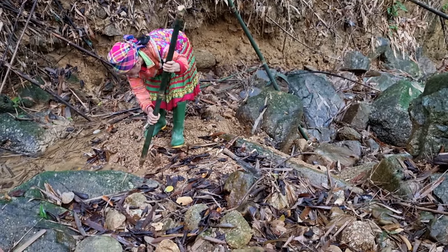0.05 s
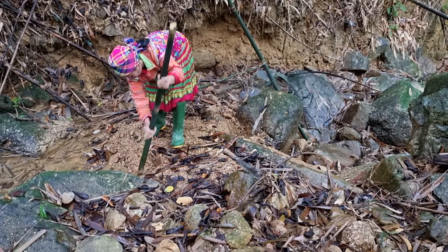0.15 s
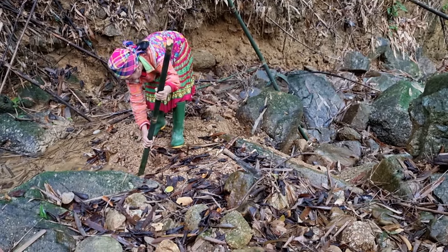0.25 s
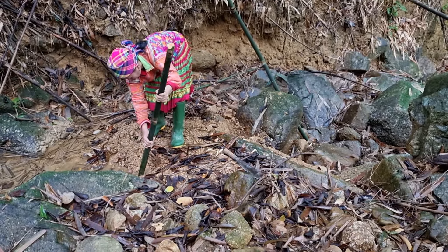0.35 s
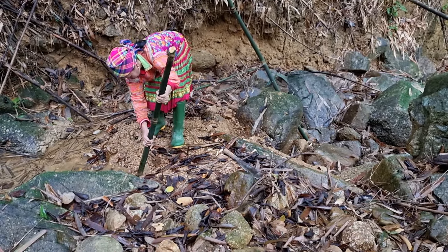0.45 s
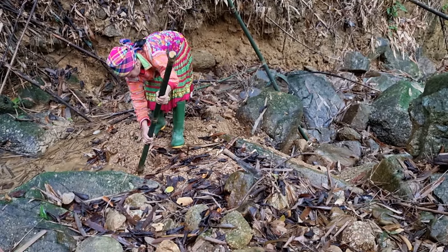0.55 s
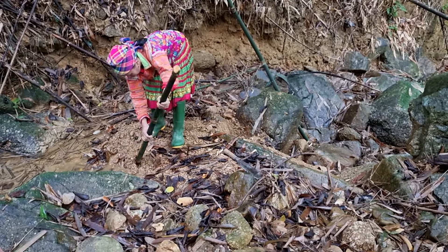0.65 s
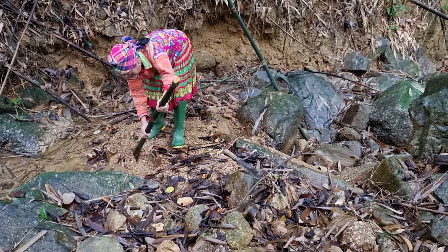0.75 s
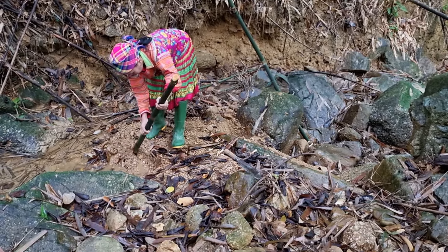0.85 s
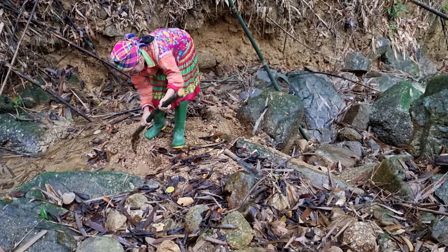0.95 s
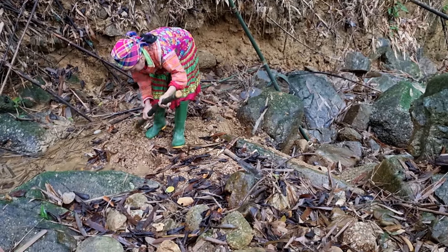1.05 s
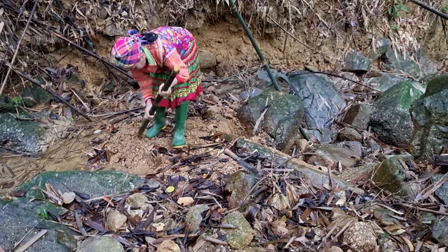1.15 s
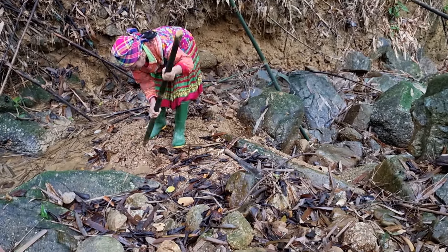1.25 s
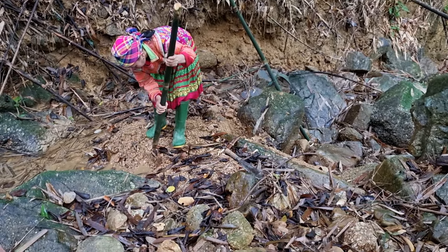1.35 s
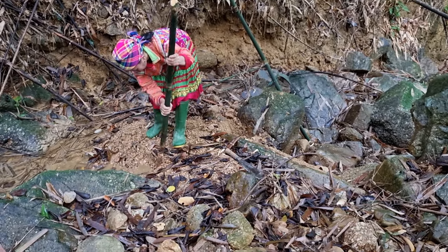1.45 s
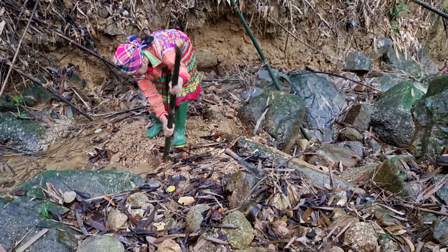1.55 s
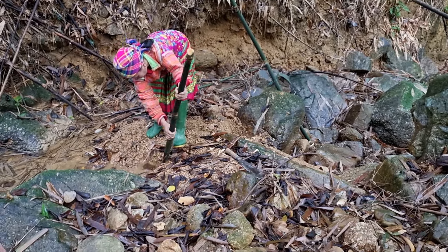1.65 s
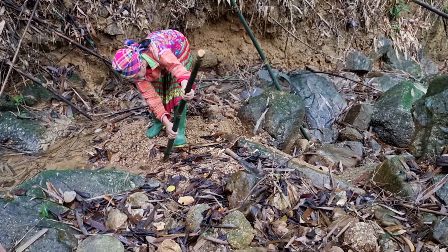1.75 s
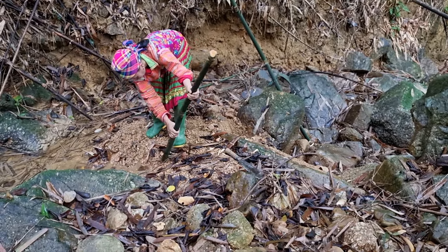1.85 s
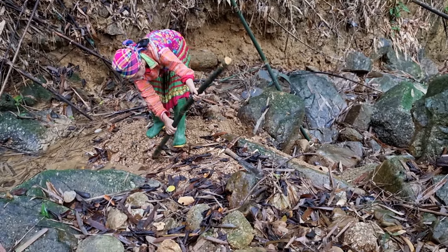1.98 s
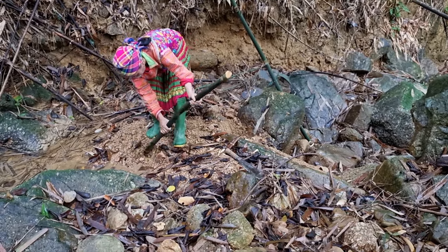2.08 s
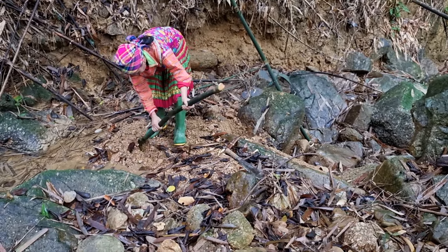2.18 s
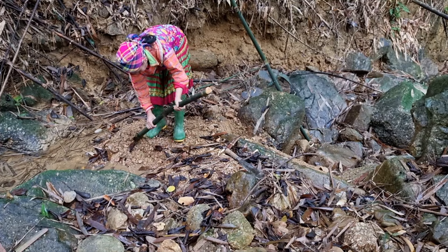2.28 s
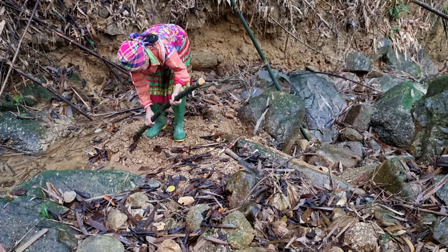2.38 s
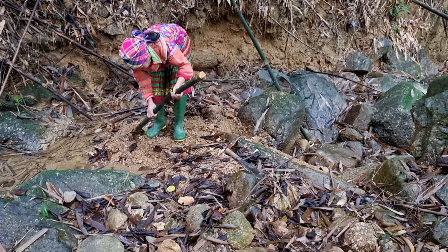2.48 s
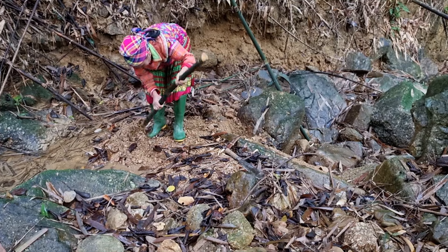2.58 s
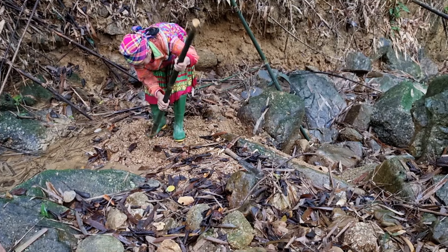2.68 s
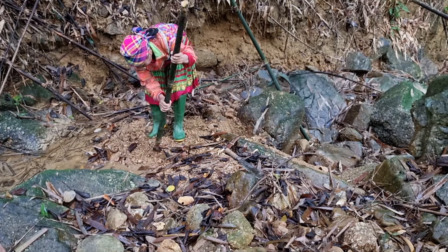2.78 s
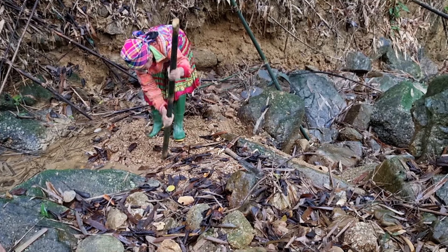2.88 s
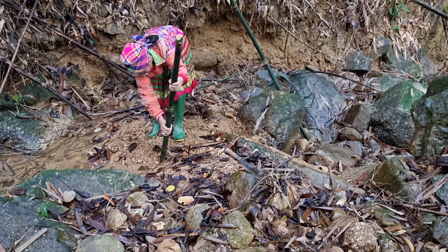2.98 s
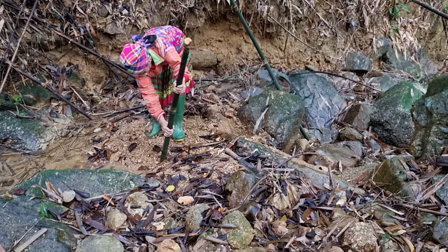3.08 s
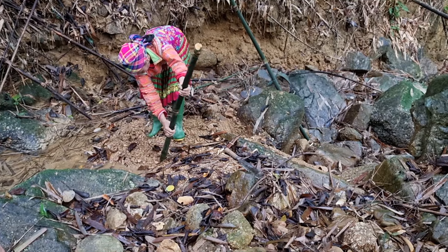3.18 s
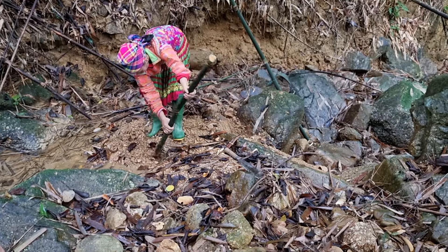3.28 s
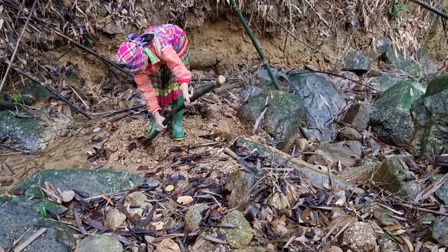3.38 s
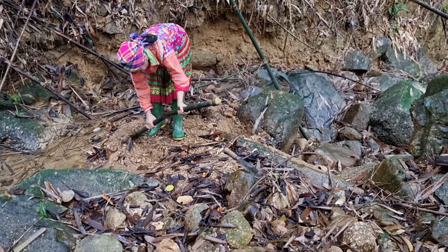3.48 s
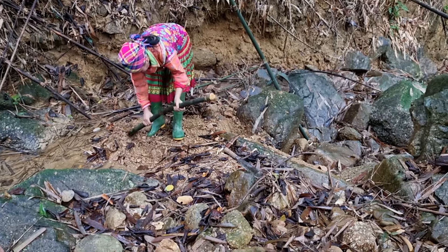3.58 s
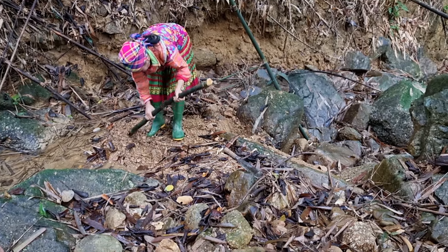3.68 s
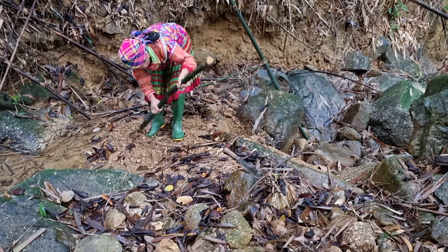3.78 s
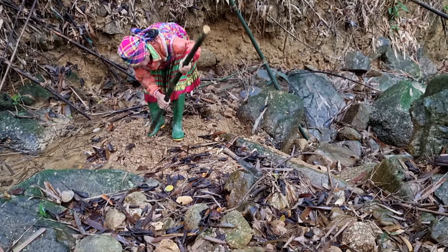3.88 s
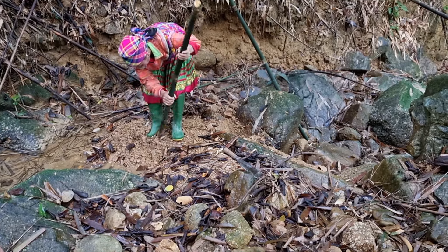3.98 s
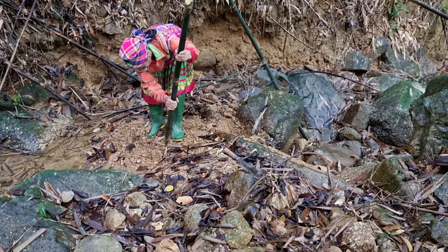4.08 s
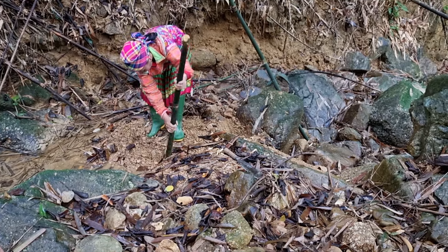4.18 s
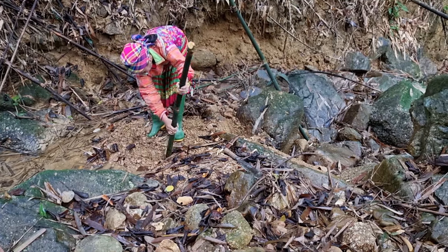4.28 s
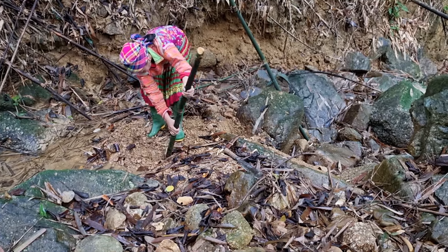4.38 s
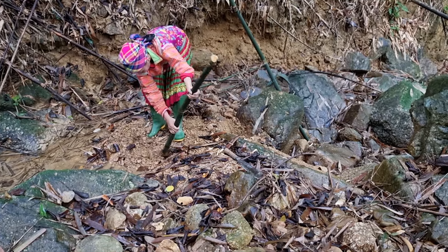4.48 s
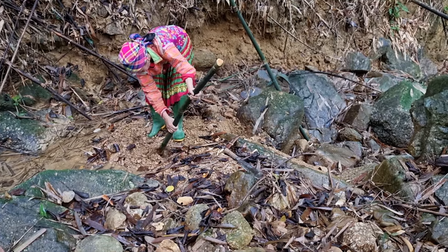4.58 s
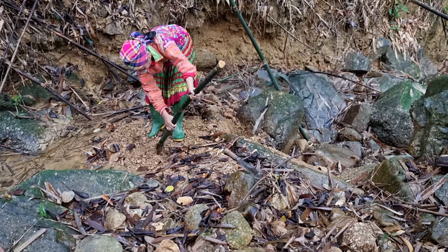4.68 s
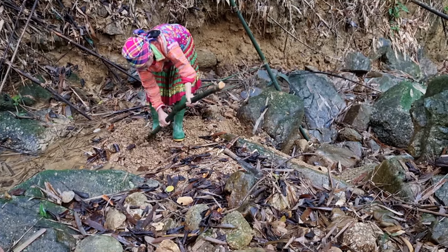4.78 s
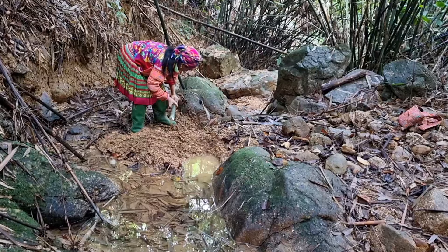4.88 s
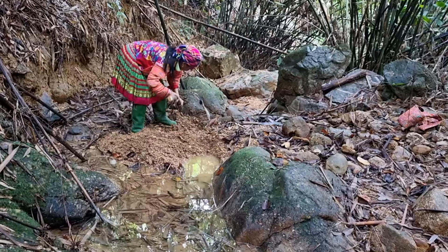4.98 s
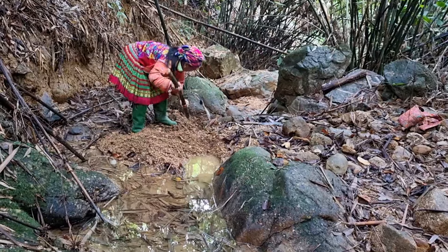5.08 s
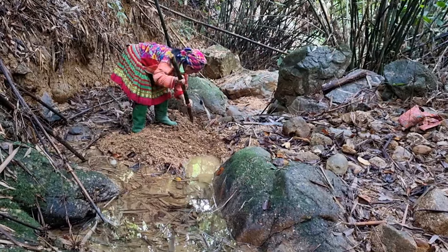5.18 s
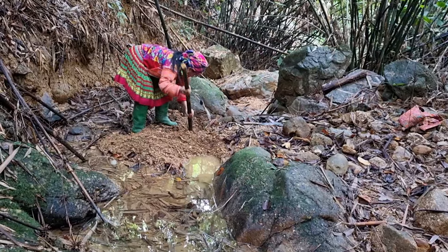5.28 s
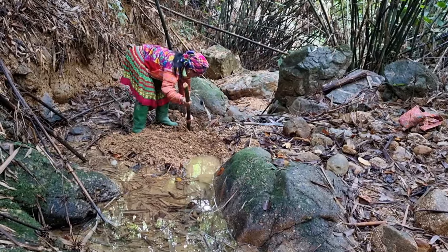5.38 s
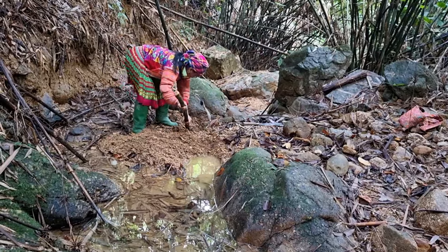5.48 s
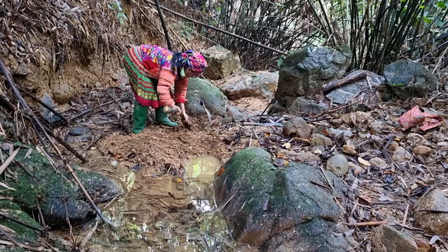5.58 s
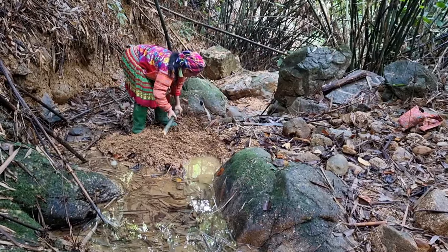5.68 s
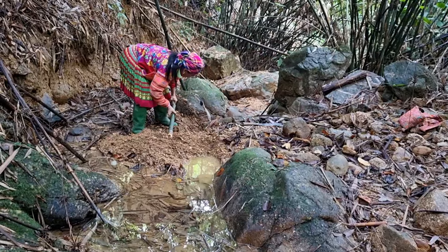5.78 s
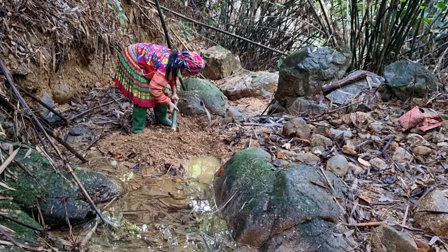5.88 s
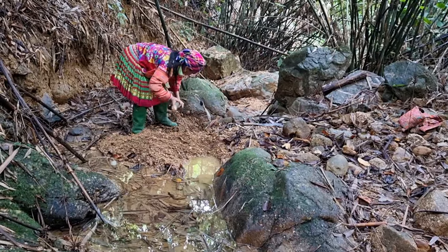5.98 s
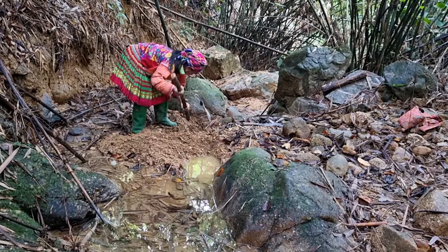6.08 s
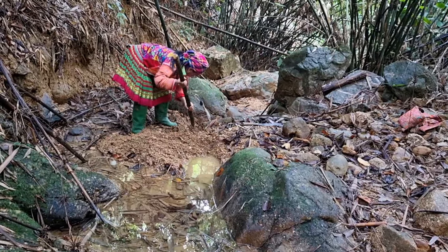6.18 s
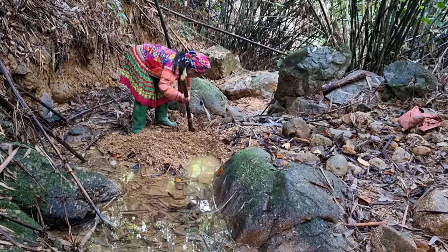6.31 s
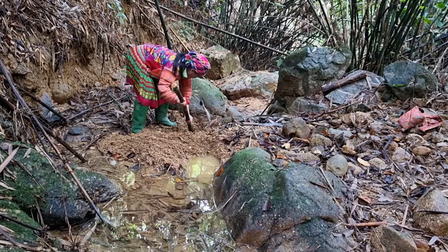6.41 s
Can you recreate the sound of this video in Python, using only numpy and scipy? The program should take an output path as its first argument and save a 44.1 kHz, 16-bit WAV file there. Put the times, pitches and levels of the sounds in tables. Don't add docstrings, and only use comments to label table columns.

```python
import sys
import numpy as np
from scipy import signal
from scipy.io import wavfile
from scipy.ndimage import map_coordinates

SR = 44100
rng = np.random.default_rng(int(sys.argv[2]) if len(sys.argv) > 2 else 0)


def store_wav(level_fs):
    pcm = np.round(np.clip(np.atleast_2d(level_fs), -1, 1) * 32767)
    wavfile.write(sys.argv[1], SR, pcm.T.astype(np.int16))


def magnitude_from_level(level_db):
    exponent = np.asarray(level_db, float) / 20
    return 10 ** exponent


N = 284445
JOIN_S = 4.96


def rms_one(x):
    return x / np.sqrt(np.mean(x ** 2) + 1e-20)


def in_time(rows):
    s, *columns = np.transpose(rows)
    return [np.interp(np.arange(N) / SR, s, column) for column in columns]


def at_hz(points, hz):
    curve_hz, value = np.transpose(points)
    return np.interp(np.log(hz), np.log(curve_hz), value)


def drift(rate_hz):
    r = np.exp(-32 * np.pi * rate_hz / SR)
    white = rng.standard_normal(N // 16 + 2002)
    slow = signal.lfilter([1], [1, -2 * r, r * r], white)[2000:]
    return np.interp(np.arange(N) / 16, np.arange(len(slow)), rms_one(slow))


def resonate(x, hz, width_hz):
    r, w = np.exp(-np.pi * width_hz / SR), 2 * np.pi * hz / SR
    gain = np.sqrt((1 - r * r) / 2)
    return signal.lfilter(gain * np.array([1, 0, -1]), [1, -2 * r * np.cos(w), r * r], x + 1e-18)


def grains(per_s, spread_db):
    sizes_db = spread_db * np.minimum(rng.exponential(1, N), 5)
    signed = magnitude_from_level(sizes_db) * rng.choice([-1, 1], N)
    return rms_one(signed * (rng.random(N) < per_s / SR))


# frequency_hz [Hz], density_db [dB per Hz]
BROOK_SPECTRUM = [(30, -22.5), (98, -19.5), (270, -23), (600, -9), (950, -10.5), (1300, -9), (1500, -4.5),
                  (1900, 0.5), (3000, -4), (6000, -5.5), (7600, -6.5), (9500, -11.5), (15000, -10)]
# start_s [s], level_db [dB]
BROOK_FLOW = [(0, -47.5), (1.5, -48.5), (2.06, -43.5), (2.75, -48.5), (3.5, -43.5), (3.95, -49.5),
              (4.9, -44), (5.0, -45.5), (5.6, -44.5), (6.45, -41)]
# frequency_hz [Hz], likeness [-1 to 1]
BROOK_COHERENCE = [(60, 0.12), (290, 0.68), (640, 0), (15000, 0.0049)]


def brook():
    out, together = 0, drift(4)
    edges_hz = 33.2 * 2 ** np.arange(0, 9.1, 1 / 3)
    white = rng.standard_normal((2, 2, N))
    for k, (low, high) in enumerate(zip(edges_hz, edges_hz[1:])):
        band = signal.butter(3, [low, high], "band", fs=SR, output="sos")
        mid, side = signal.sosfilt(band, white[k % 2])
        hz = np.sqrt(low * high)
        alike = np.clip(at_hz(BROOK_COHERENCE, hz), -1, 1)
        gain = magnitude_from_level(at_hz(BROOK_SPECTRUM, hz) + 0.7 * together + 0.9 * drift(14))
        out = out + gain * (np.sqrt(1 + alike) * mid + np.sqrt(1 - alike) * side * [[1], [-1]])
    return rms_one(out) * magnitude_from_level(in_time(BROOK_FLOW)[0] + 3.5)


PEBBLES_DB_PER_S, GRIT_DB_PER_S, CLODS_DB_PER_S, THUMP_DB_PER_S = 597, 323.5, 454, 417
STAB_HOLE_HZ = 1750


def push_db(t, push_s, level_db, release_db_per_s):
    sag = -69.5 * np.clip(t, 0, push_s)
    attack = 2600 * t
    release = release_db_per_s * (push_s - t)
    return level_db + sag + np.minimum(0, np.minimum(attack, release))


# start_s [s], push_s [s], pebbles_db [dB], grit_db [dB], thump_db [dB]
STAB_EVENTS = [(0.0, 0.016, -54, -44.5, -77), (0.77, .06, -60, -45, -80), (0.99, 0.036, -61, -47.5, -78),
               (1.772, 0.011, -51, -44, -75), (2.05, 0.054, -45, -36, -70), (0.21, .02, -47, -40, -65),
               (0.229, 0.037, -33.5, -32.5, -48.5), (0.479, 0.032, -44, -46, -63),
               (1.572, 0.059, -24.5, -29, -40.5), (1.817, 0.025, -38.5, -60, -62),
               (2.751, .02, -59, -42, -78), (2.903, 0.0055, -50, -60, -73), (2.953, 0.037, -27, -27.5, -40),
               (3.859, 0.01, -53, -41.5, -84), (4.218, .024, -26, -28, -43.5),
               (4.25, 0.025, -36, -32.5, -51.5), (5.376, 0.022, -30.5, -38, -41.5),
               (5.405, 0.029, -31.5, -33, -43.5), (5.658, 0.017, -32, -37.5, -52),
               (6.322, 0.047, -33, -37, -57), (6.363, 0.073, -25.5, -34, -43)]


def stabs(t):
    moves = []
    for s, push_s, pebbles_db, grit_db, thump_db in STAB_EVENTS:
        since, late = t - s, t - s - 0.0085
        driven = push_db(since, push_s, grit_db, GRIT_DB_PER_S)
        settling = push_db(since, push_s, grit_db - 10, 108)
        levels = [push_db(since, push_s, pebbles_db, PEBBLES_DB_PER_S),
                  np.maximum(driven, settling),
                  push_db(late, push_s, thump_db + 0.5, CLODS_DB_PER_S),
                  push_db(late, push_s, thump_db, THUMP_DB_PER_S)]
        firmer = 1.3 if s > JOIN_S else 1
        moves.append((levels, STAB_HOLE_HZ * firmer))
    return moves


# start_s [s], length_s [s], clods_db [dB], thump_db [dB]
CLOD_EVENTS = [(0.057, .015, -57.5, -82), (0.237, .02, -52.5, -48), (0.773, .04, -46, -56.5),
               (1.72, 0.033, -62, -58), (2.27, 0.089, -44.5, -46.5), (2.778, 0.035, -50, -59),
               (3.37, 0.015, -46.5, -50), (3.536, 0.032, -44, -52), (5.132, 0.019, -51, -63),
               (6.327, .045, -42, -66), (6.376, 0.045, -36.5, -60)]


def clod_falls(t, trickle):
    moves = []
    for s, length_s, clods_db, thump_db in CLOD_EVENTS:
        levels = [trickle[0], trickle[1],
                  push_db(t - s, length_s, clods_db, CLODS_DB_PER_S),
                  push_db(t - s, length_s, thump_db, THUMP_DB_PER_S)]
        moves.append((levels, STAB_HOLE_HZ))
    return moves


# start_s [s], pressure_db [dB], pitch_hz of the opening hole [Hz]
DRAG_STROKES = [
    [(.54, -57, 1800), (.6, -40, 1800), (.635, -37.5, 1600), (.68, -39, 1240), (.82, -42, 1100),
     (.88, -47, 830), (.966, -44.5, 780), (1.0, -65, 780)],
    [(1.86, -51, 1800), (1.95, -37, 1830), (1.975, -41, 1700), (2.08, -34.5, 1290), (2.125, -37.5, 1280),
     (2.2, -37.5, 1270), (2.28, -38.5, 1250), (2.345, -45.5, 560), (2.5, -58.5, 1500)],
    [(3.225, -63, 1900), (3.26, -42.5, 1900), (3.38, -34.5, 1220), (3.445, -39.5, 1250),
     (3.48, -34.5, 1260), (3.575, -43.5, 1280), (3.68, -66, 1800)],
    [(4.42, -51, 1500), (4.51, -39.5, 1230), (4.59, -39.5, 1300), (4.69, -44.5, 1400), (4.78, -39, 1460),
     (4.85, -41.5, 720), (4.9, -39, 720)],
]
# grit_db [dB], clods_db [dB], thump_db [dB]
DRAG_LAYERS = [
    (-6, -8.5, -28.5),
    (-7.5, -10, -17.5),
    (-5, -9.5, -21.5),
    (-9.5, -9.5, -27),
]


def drags(t):
    moves = []
    for rows, (grit_db, clods_db, thump_db) in zip(DRAG_STROKES, DRAG_LAYERS):
        s, db, hz = np.transpose(rows)
        pressure = np.interp(t, s, db, left=-120, right=-120)
        along = np.clip((t - s[0]) / (s[-1] - s[0]), 0, 1) - 0.5
        levels = [pressure,
                  pressure + grit_db,
                  pressure + clods_db + 3.5 * along,
                  pressure + thump_db + 9 * along]
        moves.append((levels, np.interp(t, s, hz)))
    return moves


# pebbles_db [dB], grit_db [dB], clods_db [dB], thump_db [dB]
TRICKLE_LEVELS = [
    (-76.5, -62, -76.5, -83),
    (-46.5, -44, -56.5, -76),
]


def effort():
    t = np.arange(0, N + 32, 32) / SR
    levels = np.array(TRICKLE_LEVELS, float)[(t > JOIN_S).astype(int)].T
    hole_hz = np.full(len(t), float(STAB_HOLE_HZ))
    for move, hz in stabs(t) + clod_falls(t, levels) + drags(t):
        hole_hz = np.where(move[0] > levels[0], hz, hole_hz)
        levels = np.maximum(levels, move)
    return in_time(np.column_stack([t, *levels, hole_hz]))


# frequency_hz [Hz], density_db [dB per Hz]
GRAVEL_SPECTRUM = [(200, -5.5), (400, -20), (700, 1), (1000, -6), (1300, -1), (2000, -1.5), (2500, -3.5),
                   (3200, -6.5), (4600, -7.5), (6000, -15.5), (8000, -15), (9500, -18), (16000, -25)]


def grinding(pebbles_db, grit_db, clods_db, hole_hz):
    out = np.zeros(N)
    slips_db = 1.4 * drift(46) + 1.04 * drift(240)
    cracks = grains(per_s=700, spread_db=5.0)
    for hz in np.geomspace(250, 15500, num=28):
        fine = np.clip(np.log(hz / 2250) / np.log(1.35), 0, 1)
        coarse = np.clip(np.log(1100 / hz) / np.log(1.6), 0, 1)
        force_db = pebbles_db + fine * grit_db + coarse * clods_db + slips_db + 0.7 * drift(33)
        colour_db = at_hz(GRAVEL_SPECTRUM, hz) + 10 * np.log10(hz / 1500) + 5.74 * fine + 9.3 * coarse - 9
        hollow_db = 5.3 * np.exp(-(np.log(hz / hole_hz) / 0.24) ** 2)
        contacts = grains(per_s=300 + 0.7 * hz, spread_db=3.0) + 0.55 * cracks
        struck = resonate(contacts * magnitude_from_level(force_db + colour_db + hollow_db + 0.5), hz, 0.28 * hz)
        out += resonate(struck, hz, 0.28 * hz) * np.sqrt(hz / SR)
    return out


# pitch_hz [Hz], width_hz [Hz], level_db [dB]
GROUND_MODES = [(62, 43, -5), (117, 46, 0), (197.4, 54, -1.5), (318, 23, -8)]


def thumps(thump_db):
    pushes = grains(per_s=600, spread_db=-0.5) * magnitude_from_level(thump_db - 4.5)
    shake = sum(magnitude_from_level(db) * resonate(pushes, hz, width_hz) for hz, width_hz, db in GROUND_MODES)
    return signal.sosfilt(signal.butter(2, [42, 450], "band", fs=SR, output="sos"), shake)


def crackle():
    envelope = signal.lfilter([1], [1, -0.97], np.abs(grains(per_s=90, spread_db=1.0)))
    ticks = envelope * rng.standard_normal(N)
    bright = signal.sosfilt(signal.butter(2, 3000, "high", fs=SR, output="sos"), ticks)
    level_db = np.where(np.arange(N) / SR < JOIN_S, -60, -47.5)
    return rms_one(bright) * magnitude_from_level(level_db)


# start_s [s], peak_db [dB], pitch_hz [Hz], grit_share_db [dB]
FIRST_SPOT_STONES = [(0.225, -16, 2400, -3), (0.239, -20, 1920, -5), (1.596, -6, 2700, -20),
                     (0.677, -20.5, 1210, 4), (1.171, -22, 6700, -5), (1.271, -26.5, 5000, 4),
                     (1.399, -28.5, 7700, -12), (1.454, -19.5, 5000, -10), (2.484, -21.5, 4330, 2),
                     (2.517, -23, 4120, -5), (2.75, -24.5, 2280, 10), (2.778, -25.5, 7700, -10),
                     (2.907, -24.5, 7600, -17), (2.951, -27.5, 1630, -7.5), (3.863, -24, 2300, 2),
                     (0.522, -27.5, 1490, -15), (0.634, -17, 1930, -25), (0.859, -28, 1510, 1),
                     (1.998, -23, 1530, 0), (2.088, -14, 1400, -22), (2.135, -25, 1250, -20),
                     (2.2, -17, 1300, -20), (3.243, -29, 2000, -15), (3.45, -18, 1840, -4),
                     (4.384, -25, 1870, -21), (4.633, -30, 2210, 7)]
# start_s [s], peak_db [dB], pitch_hz [Hz], grit_share_db [dB]
SECOND_SPOT_STONES = [(5.061, -30.5, 1540, 6.5), (5.119, -36, 1950, 8), (5.14, -26, 5500, 4),
                      (5.214, -13.5, 3000, -6), (5.255, -17.5, 3260, -2), (5.302, -19.5, 3880, -2),
                      (5.385, -20.5, 6500, -9), (5.56, -38, 2060, -12), (5.582, -16, 3050, -11),
                      (5.606, -30, 5860, 11), (5.749, -25, 7610, -5), (5.784, -22, 4840, 1),
                      (5.806, -25, 6150, 1), (5.85, -25, 6540, 6), (5.88, -15.5, 6400, -10),
                      (5.894, -16, 7900, -3), (5.911, -13, 2840, -9), (5.971, -17, 3760, -18),
                      (6.01, -16, 1880, -0.5), (6.059, -11, 3400, -14), (6.088, -28, 1330, 5),
                      (6.131, -16.5, 4600, 3.5), (6.173, -22, 5480, 0.5), (6.228, -27.5, 8100, 5),
                      (6.33, -17, 1400, -11), (6.369, -7.5, 1930, -31), (6.385, -13, 2900, -19),
                      (6.4, -6, 2870, -15)]
# start_s [s], peak_db [dB], pitch_hz [Hz]
SHAFT_KNOCKS = [(0.479, -21.5, 2300), (0.626, -12, 1570), (0.747, -22, 1200), (1.575, -20, 1290),
                (1.589, -16, 1610), (1.773, -23.5, 1990), (1.825, -24, 1340), (1.907, -24, 2370),
                (2.015, -16.5, 3070), (2.072, -17, 1400), (2.13, -18, 1750), (2.155, -21, 1210),
                (2.18, -14, 1670), (2.243, -22.5, 1510), (2.298, -24.5, 1290), (2.961, -9.5, 1350),
                (3.277, -16, 2340), (3.321, -16, 2100), (3.37, -10.5, 1240), (3.408, -21, 1250),
                (3.467, -15.5, 1240), (3.504, -12.5, 1620), (4.222, -12, 1960), (4.229, -8, 1360),
                (4.588, -17, 1490), (4.844, -27, 680), (5.382, -5.5, 2460), (5.664, -10.5, 1620),
                (6.411, -7, 2020), (6.423, -10, 1990)]


def stones():
    out, t = np.zeros(N + 2000), np.arange(2000) / SR
    shape = (1 - np.exp(-t / 0.0014)) * (np.exp(-t / 0.0015) + 0.091 * np.exp(-t / 0.017))
    knocked = [(s, db, hz, -19) for s, db, hz in SHAFT_KNOCKS]
    for s, db, hz, grit_db in knocked + list(FIRST_SPOT_STONES) + list(SECOND_SPOT_STONES):
        chatter = rng.standard_normal(2000) * magnitude_from_level(7.3 * rng.standard_normal(2000)) * shape
        ring = resonate(chatter, hz, 0.16 * hz)
        spray = np.diff(resonate(chatter, 3100, 5100), prepend=0)
        click = ring / np.abs(ring).max() + magnitude_from_level(grit_db + 3.5) * spray / np.abs(spray).max()
        out[round(s * SR):][:2000] += magnitude_from_level(db - 7) * click
    return out[:N]


# start_s [s], pitch_hz [Hz], level_db [dB]
DOVE_COO = [
    (3.86, 555, -115),
    (3.92, 560, -65),
    (4.05, 562, -69),
    (4.1, 560, -89),
    (4.16, 560, -81),
    (4.4, 555, -61),
    (4.46, 550, -111),
]


def dove():
    hz, db = in_time(DOVE_COO)
    return magnitude_from_level(db + 1.5 * drift(25)) * np.sin(2 * np.pi * np.cumsum(hz) / SR)


RIGHT_PORT_LAG = [2.81, 6.6]


def ports(x, scatter_db=1.0, decay_s=0.003, hop=1024):
    lag = np.where(np.arange(N) / SR < JOIN_S, *RIGHT_PORT_LAG)
    direct = np.array([x, map_coordinates(x, [np.arange(N) - lag], order=3)])
    highs = signal.lfilter(*signal.butter(1, 1700, "high", fs=SR), x)
    t, scattered = np.arange(hop) / SR, np.zeros((2, N + 4 * hop))
    window = np.sqrt(np.hanning(2 * hop))
    tail = np.exp(-t / decay_s) * (t > 0.0004) / np.sqrt(decay_s * SR / 2)
    for i in range(0, N, hop):
        piece = highs[i:i + 2 * hop]
        echoes = rng.standard_normal((2, hop)) * tail
        heard = signal.fftconvolve((piece * window[:len(piece)])[None], echoes, axes=1)
        scattered[:, i:i + heard.shape[1]] += heard
    return direct + magnitude_from_level(scatter_db) * scattered[:, :N]


def fade():
    t = np.arange(N) / SR
    out_db = -300 * np.maximum(t - 4.845, 0) - 3500 * np.maximum(t - 4.884, 0)
    rise = np.clip((t - 5.012) / 0.05, 0, 1) ** 1.9
    return magnitude_from_level(out_db) + rise


def scene():
    pebbles_db, grit_db, clods_db, thump_db, hole_hz = effort()
    digging = grinding(pebbles_db, grit_db - pebbles_db, clods_db - pebbles_db, hole_hz)
    digging = digging + thumps(thump_db) + stones() + crackle()
    spread = thumps(thump_db - 16) * [[1], [-1]]
    return ports(digging) * magnitude_from_level([[0.2], [-0.2]]) + spread + brook() + dove()


def band_limit(x):
    return signal.sosfilt(signal.butter(12, 16170, fs=SR, output="sos"), x)


def record(dry):
    lifted = dry + magnitude_from_level(-18.5) * resonate(dry, 7730, 990)
    cut = signal.sosfilt(signal.cheby2(16, 60, 16100, fs=SR, output="sos"), lifted)
    return band_limit(cut * fade())


dry = scene()
out = record(dry)
store_wav(out)
```